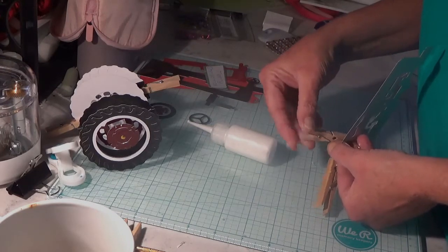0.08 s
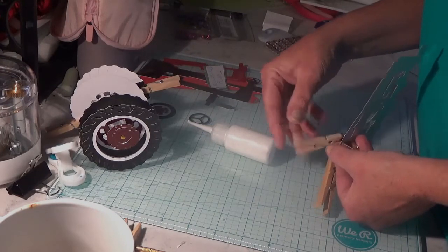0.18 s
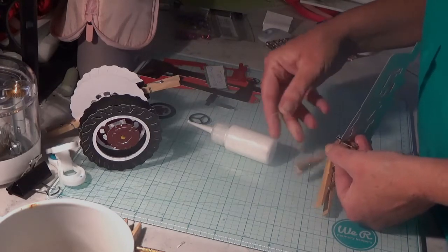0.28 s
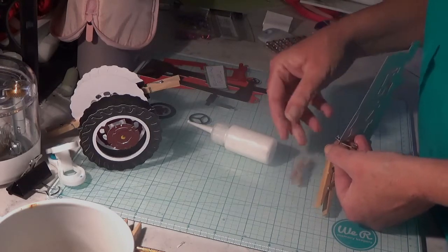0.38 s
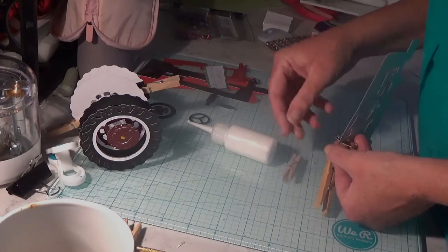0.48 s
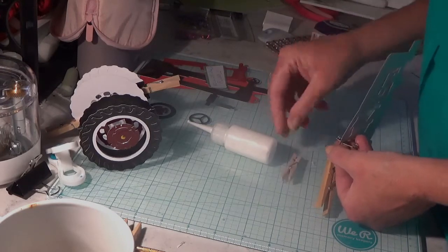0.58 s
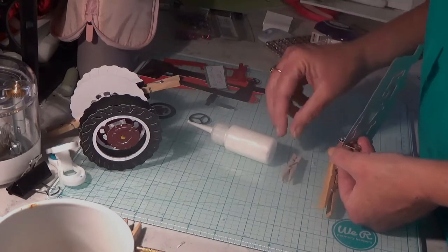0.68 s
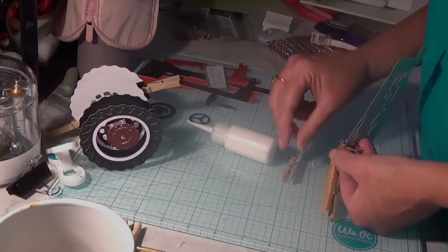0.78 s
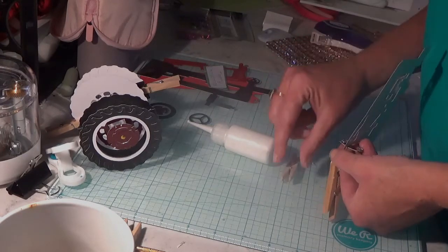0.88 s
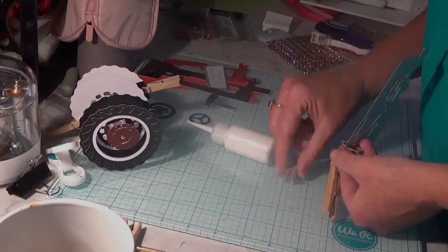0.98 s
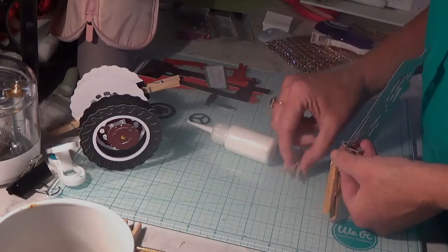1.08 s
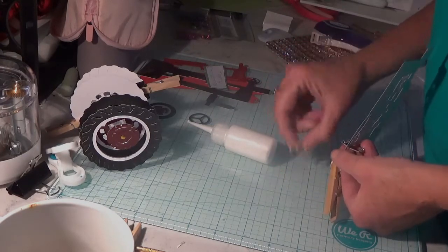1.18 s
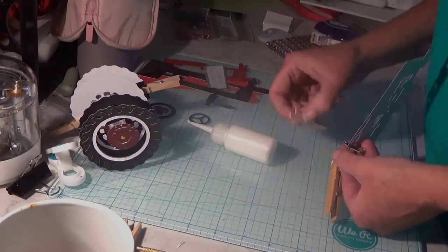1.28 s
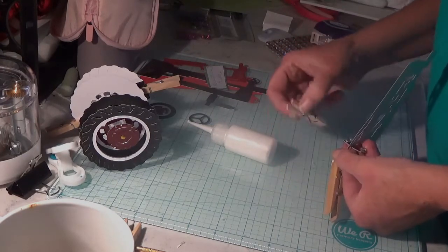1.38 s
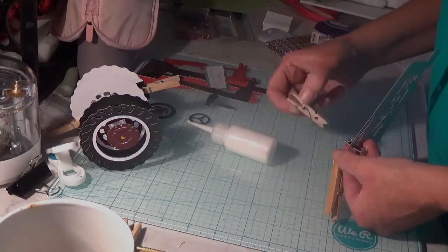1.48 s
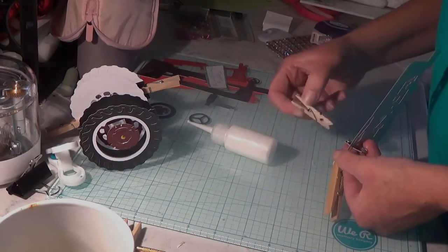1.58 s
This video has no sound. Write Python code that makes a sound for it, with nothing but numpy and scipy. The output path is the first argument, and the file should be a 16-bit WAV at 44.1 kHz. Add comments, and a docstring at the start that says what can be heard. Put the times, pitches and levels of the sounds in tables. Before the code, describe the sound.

Dropped wooden clothespin clatters briefly on a table, followed by faint taps and one click.

```python
"""A dropped clothespin

A wooden spring clothespin slips from the fingers, bounces on a craft table and rattles to rest.
Fingers pick it up again and it clicks once in the hand. Each hit is a dry crack plus short wooden
tones, while the spring and things on the table ring faintly and a small room echoes.
Behind it are a camera's soft ticking, a low mains hum and a steady hiss."""
import sys
import numpy as np
from scipy import signal
from scipy.fft import rfft, irfft, next_fast_len
from scipy.io import wavfile
from scipy.ndimage import map_coordinates

SR = 44100
rng = np.random.default_rng(int(sys.argv[2]) if len(sys.argv) > 2 else 0)


def unload_audio(sound):
    """Save the sound as a 16-bit wav file, at the path given as the first command line argument."""
    columns = np.transpose(np.atleast_2d(sound))
    # keep every value between -1 and 1, then stretch to whole-number steps
    steps = np.round(np.clip(columns, -1, 1) * 32767)
    wavfile.write(sys.argv[1], SR, steps.astype(np.int16))


N = 70560  # 1.6 seconds


def clothespin():
    """The pin's separate hits, plus a run of quickening, fading taps as it settles."""
    # Each hit; the spot that is struck decides which pitch bands are strong.
    # Columns: start_s, level_db, rise_s, knock_db, clop_db, clack_db, snap_db, tick_db
    hits = [(0.2349, -1, 0.0012, 1.5, -2.5, -13.5, 2, -7.5), (0.3024, -3, 0.0012, -4.5, -2, 7, -6, -5),
            (0.3138, -10.5, 0.00018, -1.5, -12, -9.5, 1.5, 14), (0.3264, -10.5, 0.00093, 1, 0, 5, 2.5, 1),
            (.3405, -23.5, 0.00097, -5, 4, -16, 15, 1), (0.3671, -11, 0.0019, -6.5, 6.5, 6.5, 8, 3.5),
            (.3940, -12, .0012, -3, -7.5, -4, -4.5, -2), (.4250, -29.5, 0.0039, 5, 14.5, 5, 7, 16),
            (.4420, -25, 0.0049, 7, 4, -1, -3, 3), (.4875, -20, 0.0011, 2, -9.5, -12, -6, -2.5),
            (.4955, -20.5, 0.002, -3, -8, -11, -2, -10), (0.5029, -25, 0.00035, 5.5, -9, -6.5, -11, -6),
            (0.51, -19.5, 0.0009, -10.5, -12, -13, -11, -1.5),
            (0.9057, -30, 0.0015, 2.5, -15, -2.5, -12, -14),
            (.9878, -26.5, 0.0017, -3, -9, -12, -10.5, -1.5), (.9970, -34, 0.0014, 10.5, 3, -1.5, -12, -3),
            (1.403, -58.5, 0.00038, -6, -5, -4, 17, 25),
            (1.4798, -16, 0.0015, -6.5, -10.5, 1.5, 5.5, -13.5)]
    # The tone of every settling tap: knock_db, clop_db, clack_db, snap_db, tick_db
    rattle_tone = (10.5, -12.5, -6, -3.5, 1.5)
    track = np.zeros((2, N))
    for start_s, *settings in hits:
        add(track, start_s, hit(*settings))
    rattle_start_s, rattle_end_s, fade_db_per_s = .522, .588, 106
    first_gap_s, gap_shrink, rise_s = .008, .93, .003
    start_s = rattle_start_s
    for k in range(12):
        level_db = -26 - fade_db_per_s * (start_s - rattle_start_s)
        tap = hit(level_db, rise_s, *rattle_tone)
        if start_s < rattle_end_s:
            add(track, start_s, tap)
        start_s += first_gap_s * gap_shrink ** k * np.exp(0.16 * rng.standard_normal())
    return filtered(track, path_to_microphones)


def hit(level_db, rise_s, knock_db, clop_db, clack_db, snap_db, tick_db):
    """One blow sets off a crack, wooden tones and a faint ring, heard directly and through the room."""
    # Centres of the knock, reference, clop, clack, snap and tick bands: pitch_hz
    bands_hz = [900, 2000, 3000, 4000, 6400, 9500]
    bands_db = np.array([knock_db, 0, clop_db, clack_db, snap_db, tick_db])
    t = np.arange(SR // 4) / SR
    rise = 1 - np.exp(-t / rise_s)
    crack = dry_crack(t) * rise
    wood = wood_tones(t) * rise
    direct = coloured(crack + wood + spring_ring(t), list(zip(bands_hz, bands_db)))
    # The room hears the pin from all sides, so it gets a more even tone.
    into_room = coloured(crack + .35 * wood, list(zip(bands_hz, .65 * bands_db)))
    heard = signal.fftconvolve(into_room[None], room_echo(), axes=1)
    add(heard, 0, signal.fftconvolve(direct[None], near_echoes(), axes=1))
    return amp(level_db) * heard


def dry_crack(t):
    """The impact itself: a burst of noise that dies almost at once."""
    # The tone of the crack: pitch_hz, gain_db
    tone = [(100, -29), (260, -19), (500, 0.5), (1200, -1), (2300, 7), (4500, 2), (8000, -1), (11000, -8.5)]
    noise = unit(coloured(rng.standard_normal(len(t)), tone))
    return amp(0.5) * noise * decay(t, fade_s=.019)


def wood_tones(t):
    """The wooden jaws and the table top vibrate briefly at their own pitches."""
    # The wood's vibrations: pitch_hz, level_db, fade_s
    tones = [(154, -33.5, 0.052), (481.4, -17.5, 0.024), (844, -12, 0.018), (1132, -6.5, 0.019),
             (1497, -5.5, 0.011), (1933, -5.5, 0.019), (2094, -10, 0.034), (3060, -1.5, .017),
             (3920, -1, 0.0086), (4110, 0.5, 0.015), (5480, -18, 0.043), (6373, -8, 0.018),
             (7670, -20.5, 0.033), (8934, -18.5, 0.038)]
    return fading_tones(tones, t)


def spring_ring(t, rise_s=.011):
    """The steel spring and loose things on the table ring on after the wood is quiet."""
    # Their vibrations: pitch_hz, relative_level_db, fade_s
    tones = [(822, -1, .3), (1168, 0, .22), (1560, -3, .16), (1903, -4, .2), (2066, -4, .26),
             (3056, -3, .18), (3155, -3, .16), (4103, -3, .15), (5150, -1, .12), (5454, 0, .11),
             (6860, 27, .045), (8488, 11, .13), (8920, 5, .08)]
    rise = 1 - np.exp(-(t / rise_s) ** 2)
    return amp(-33) * fading_tones(tones, t, blur_hz=8) * rise


def fading_tones(table, t, blur_hz=0, scatter_db=1.5):
    """A struck object's dying sine waves, a little different each time; random drift blurs each pitch."""
    pitch_hz, level_db, fade_s = np.transpose(table)[:, :, None]
    gain = amp(level_db + scatter_db * rng.standard_normal(pitch_hz.shape))
    random_walk = rng.standard_normal((len(pitch_hz), len(t))).cumsum(1)
    drift = np.sqrt(2 * np.pi * blur_hz / SR) * random_walk
    phase = 2 * np.pi * (pitch_hz * t + rng.random(pitch_hz.shape)) + drift
    return (gain * decay(t, fade_s) * np.sin(phase)).sum(0)


def near_echoes():
    """Sound arrives directly, then again off nearby surfaces, left and right."""
    # One echo per surface: left_delay_s, right_delay_s, gain
    echoes = [(.0062, .0064, 0.043), (.0088, .0087, 0.26), (0.0116, .0108, .26), (0.0255, .0279, 0.067)]
    paths = np.zeros((2, SR // 20))
    paths[:, 0] = 1
    for left_s, right_s, gain in echoes:
        paths[[0, 1], [round(left_s * SR), round(right_s * SR)]] += gain
    return paths


def room_echo(rise_s=0.0025, width=0.24):
    """The room's many echoes blend into a noisy tail in which each pitch dies at its own speed."""
    # How long the room rings: pitch_hz, fade_s
    fades = [(150, 0.57), (800, 0.34), (2500, 0.29), (6000, 0.11), (11000, 0.19)]
    # The tone of the room: pitch_hz, gain_db
    tone = [(100, 3), (500, 0.5), (1200, 1), (2100, -5), (2700, -8), (4000, -3.5), (7000, -1.5), (11000, 0)]
    hz, t, spectrum = signal.stft(rng.standard_normal((2, SR // 2)), SR, nperseg=256)
    tail = signal.istft(spectrum * decay(t, along(fades, hz)[:, None]), SR)[1]
    tail *= 1 - np.exp(-(np.arange(tail.shape[1]) / SR / rise_s) ** 2)
    middle, side = [coloured(channel / np.linalg.norm(channel), tone) for channel in tail]
    return amp(-1.5) * np.array([middle + width * side, middle - width * side])


def path_to_microphones(hz):
    """On its way from the table the sound loses narrow bands and reaches the two sides unequally."""
    # Bands that nearby clutter cancels: pitch_hz, half_width_hz, depth_db
    dips = [(315, 45, 8), (630, 30, 7), (1270, 40, 11), (1720, 60, 13), (2670, 60, 5)]
    # How much louder the left side is: pitch_hz, left_minus_right_db
    balance = [(200, 0), (550, 1.8), (1200, 1.4), (2500, .6), (4500, 0), (9000, -.6)]
    # How far the left wave runs ahead: pitch_hz, lead_radians
    lead = [(200, .04), (1000, 0.115), (2000, -0.165), (4500, .12), (6000, 0.096), (11000, .04)]
    notches = [1 - (1 - amp(-db)) / (1 + 1j * (hz - centre) / width) for centre, width, db in dips]
    sides = np.array([[.5], [-.5]])
    return np.prod(notches, axis=0) * amp(sides * along(balance, hz)) * np.exp(1j * sides * along(lead, hz))


def camera_ticking(first_s=.027, period_s=.06672, half_length_s=0.0061):
    """A camera gives off soft, regular puffs of noise."""
    # The narrow tone of a puff: pitch_hz, gain_db
    tone = [(1800, -30), (2550, 1.5), (2750, 2), (3050, 7), (3400, 2), (4400, -37.5)]
    from_tick_s = (np.arange(N) / SR - first_s + period_s / 2) % period_s - period_s / 2
    noise = unit(coloured(rng.standard_normal(N), tone))
    return amp(-54.5) * noise * np.exp(-(from_tick_s / half_length_s) ** 2)


def mains_hum():
    """Mains power hums in a few low tones, each wavering at random."""
    # The tones of the hum: pitch_hz, level_db, unsteadiness (0 is steady)
    tones = [(59, -58, 0.28), (126, -53.5, 0.9), (179, -65.5, 0.17), (295, -70.5, 0.19), (374, -66, 1)]
    t, hum = np.arange(N) / SR, 0
    for pitch_hz, level_db, unsteadiness in tones:
        waver = 1 + unsteadiness * (wobble(per_s=13) + 1j * wobble(per_s=13))
        hum += amp(level_db) * unit(np.real(waver * np.exp(2j * np.pi * pitch_hz * t)))
    return hum


def hiss():
    """Steady noise, strongest in the bass and a little different on each side."""
    # The tone of the hiss: pitch_hz, gain_db
    tone = [(15, -73), (25, -42), (44, -7.5), (69, -14), (87, -13.5), (124, -8.5), (223, -13), (247, -14.5),
            (362, -15.5), (456, -18), (588, -19), (778, -19.5), (11000, -32), (14300, -111), (22000, -120)]
    # The left-right difference compared with what both sides share: pitch_hz, gain_db
    side_tone = [(60, -26), (220, -9), (810, 0.5), (3000, -2.5), (11100, -9.5)]
    middle, side = filtered(rng.standard_normal((2, N)), lambda hz: amp(along(tone, hz)))
    side = filtered(side, lambda hz: amp(along(side_tone, hz)))
    return amp(-49.5) * unit(np.array([middle + side, middle - side]))


def amp(db):
    """Turn decibels into a gain to multiply by."""
    return 10 ** (np.asarray(db) / 20)


def unit(x):
    """Scale a sound to an average power of 1."""
    return x / np.sqrt(np.mean(x ** 2) + 1e-20)


def along(points, hz):
    """Read between (pitch_hz, value) points, with octaves evenly spaced."""
    pitches, values = np.transpose(points)
    return np.interp(np.log(hz + 1), np.log(pitches + 1), values)


def filtered(x, response):
    """Multiply each frequency in a sound by response(hz)."""
    length = x.shape[-1]
    padded = next_fast_len(length + 8192)
    return irfft(rfft(x, padded) * response(np.fft.rfftfreq(padded, 1 / SR)), padded)[..., :length]


def coloured(x, points, size=2048):
    """Shape a sound's tone by (pitch_hz, gain_db) points."""
    cepstrum = irfft(np.log(amp(along(points, np.fft.rfftfreq(size, 1 / SR)))))
    # Fold the filter forward in time, so nothing sounds before its cause.
    cepstrum[1:size // 2] *= 2
    cepstrum[size // 2 + 1:] = 0
    return signal.fftconvolve(x, irfft(np.exp(rfft(cepstrum))))[:len(x)]


def decay(t, fade_s):
    """A fall of 60 dB in fade_s seconds."""
    return np.exp(-np.log(1000) * t / fade_s)


def wobble(per_s):
    """A smooth curve through per_s random values a second."""
    return map_coordinates(rng.standard_normal(N // 100), [np.arange(N) * per_s / SR + 2])


def add(track, start_s, sound):
    """Mix a sound into a track at start_s."""
    part = track[..., round(start_s * SR):][..., :sound.shape[-1]]
    part += sound[..., :part.shape[-1]]


def scene():
    """The quiet room with the clothespin on top."""
    return hiss() + mains_hum() + camera_ticking() + clothespin()


def record(dry, top_hz=11080):
    """Round off the loudest peaks and cut the treble above top_hz."""
    rounded = dry / (1 + dry ** 6) ** (1 / 6)
    return filtered(rounded, lambda hz: 1 / np.sqrt(1 + (hz / top_hz) ** 140))


dry = scene()
out = record(dry)
unload_audio(out)
```